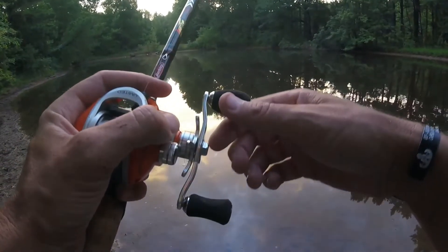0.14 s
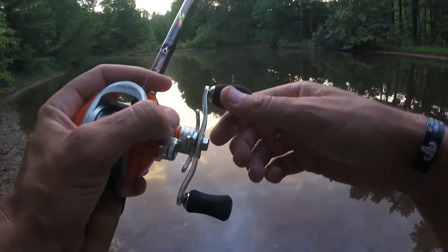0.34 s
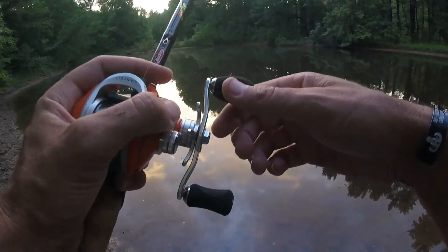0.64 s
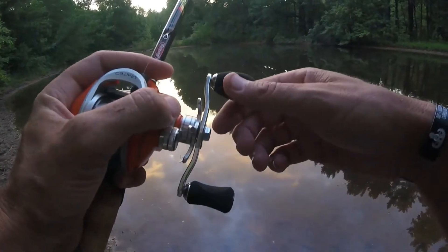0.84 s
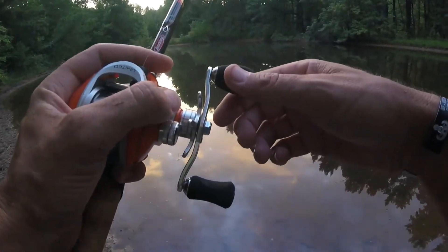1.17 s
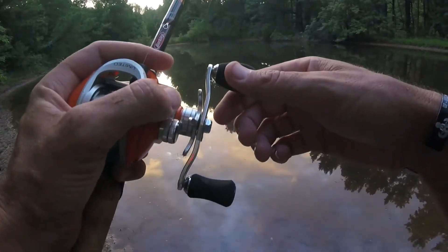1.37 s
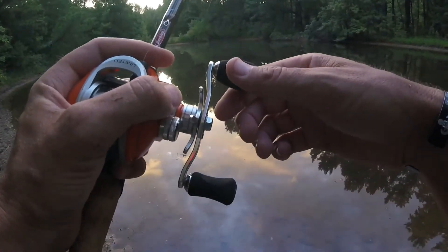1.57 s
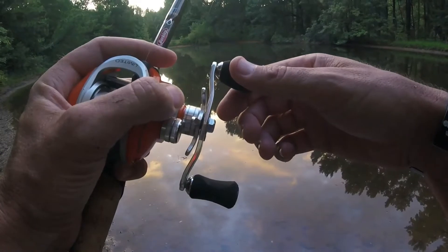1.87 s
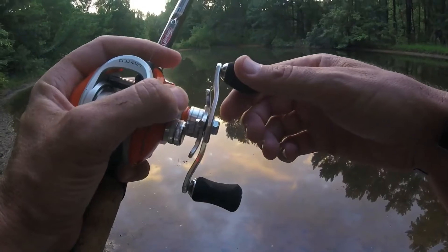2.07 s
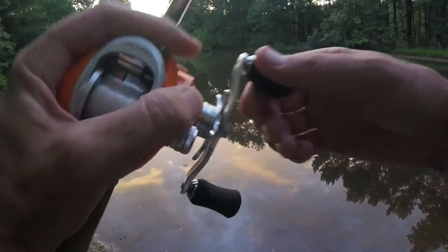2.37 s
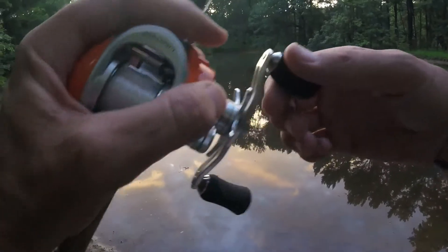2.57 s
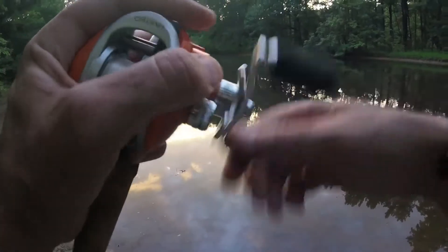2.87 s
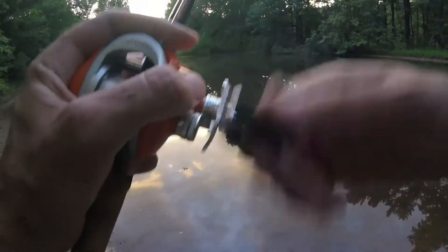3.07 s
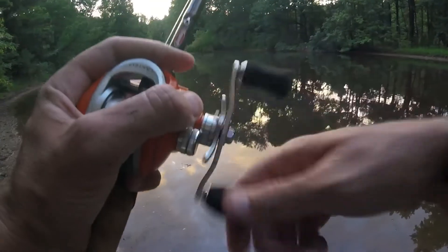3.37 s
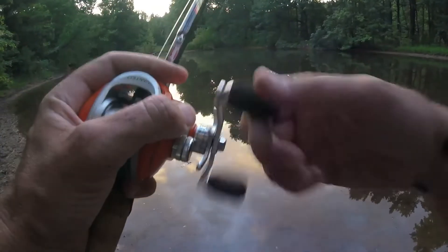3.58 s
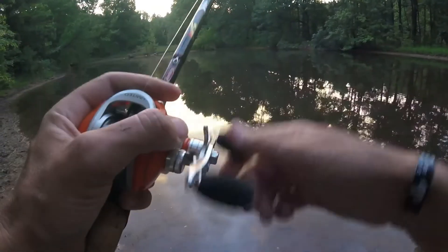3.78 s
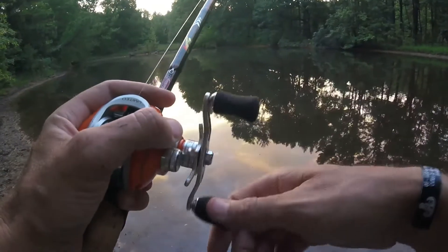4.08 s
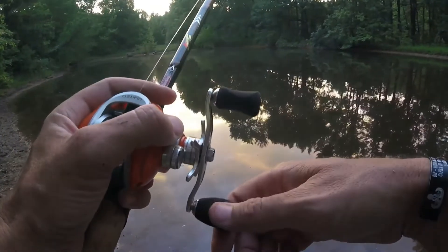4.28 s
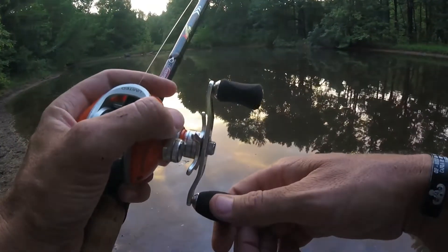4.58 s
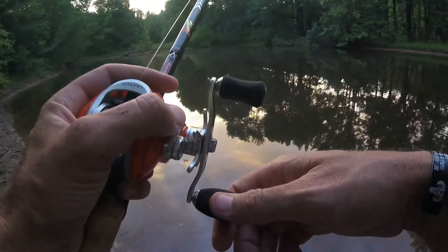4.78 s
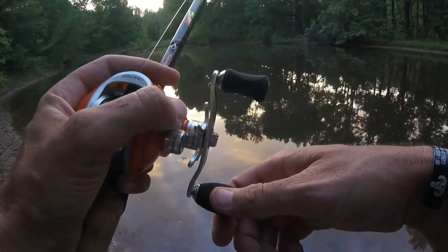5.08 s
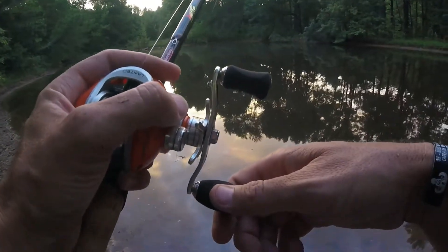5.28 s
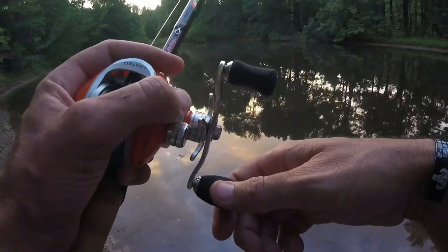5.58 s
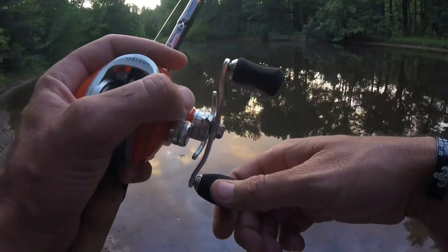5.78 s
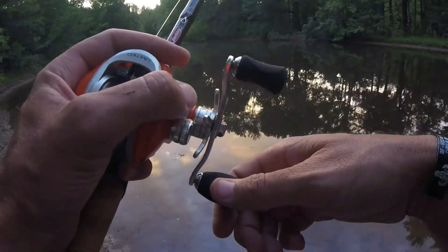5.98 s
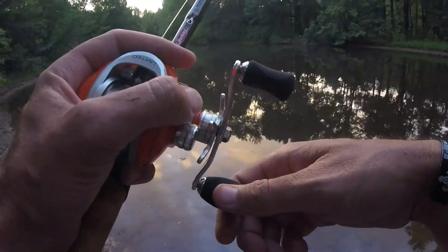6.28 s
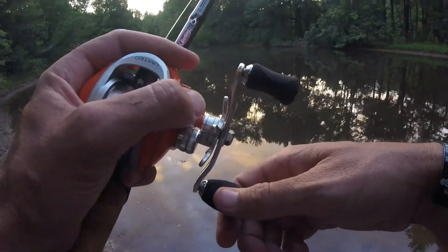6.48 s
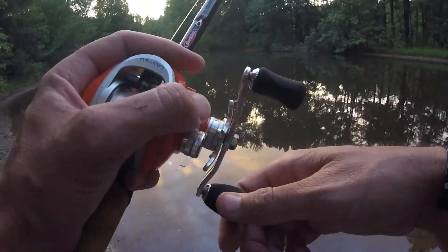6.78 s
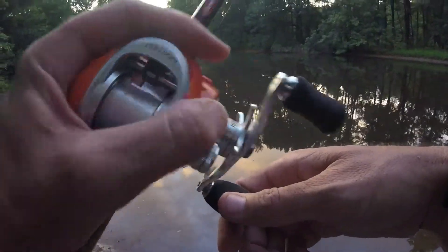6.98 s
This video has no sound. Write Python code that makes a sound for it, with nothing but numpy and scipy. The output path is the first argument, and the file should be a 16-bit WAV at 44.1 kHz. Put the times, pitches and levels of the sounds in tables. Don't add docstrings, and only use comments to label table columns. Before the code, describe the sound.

Evening crickets trill and chirp by a wooded pond over low traffic rumble; a fishing reel winds briefly with one dull knock, then a jay screams twice.

```python
import sys
import numpy as np
from scipy import signal
from scipy.io import wavfile
from scipy.ndimage import uniform_filter1d

SR = 44100
rng = np.random.default_rng(int(sys.argv[2]) if len(sys.argv) > 2 else 0)


def gain_from_db(level_db):
    decades = np.asarray(level_db, float) / 20
    return 10 ** decades


def materialize(psi):
    bounded = np.clip(np.atleast_2d(psi).T, -1, 1)
    quanta = np.round(bounded * 32767).astype(np.int16)
    wavfile.write(sys.argv[1], SR, quanta)


N = 314874


def evened(x):
    return x / np.sqrt(np.mean(x ** 2) + 1e-20)


def columns(rows, t):
    s, *rest = np.transpose(rows)
    return [np.interp(t, s, c) for c in rest]


def read(points, hz):
    f, value = np.transpose(points)
    return np.interp(np.log(hz + 1), np.log(f + 1), value)


def drift(per_s):
    steps = rng.standard_normal(4096)
    return evened(np.interp(np.arange(N) / SR * per_s, np.arange(4096), steps))


def resonate(x, hz, width_hz):
    turn = np.exp(2j * np.pi * np.cumsum(hz * np.ones(len(x))) / SR)
    r = np.exp(-np.pi * width_hz / SR)
    smooth = signal.lfilter([(1 - r) ** 2], [1, -2 * r, r * r], x / turn + 1e-18)
    return 2 * (turn * smooth).real


def add(mix, s, sound):
    part = mix[round(s * SR):][:len(sound)]
    part += sound[:len(part)]


def air():
    # (frequency [Hz], density [dB per Hz])
    spectrum = [(20, -63), (60, -62.5), (100, -63), (160, -70), (300, -77), (500, -77.5), (800, -75.5),
                (1500, -83), (2500, -88.5), (5500, -93), (7300, -87), (9000, -92), (10500, -99),
                (12500, -95)]
    frames, hz = N // 512 + 5, np.fft.rfftfreq(2048, 1 / SR)
    a, b, patches = rng.standard_normal((frames, 1025, 3)).T
    patches = evened(uniform_filter1d(uniform_filter1d(patches, 24, 0), 10, 1))
    z = (a + 1j * b) * gain_from_db(read(spectrum, hz)[:, None] + 0.83 * patches)
    hiss = signal.istft(z, nperseg=2048, noverlap=1536)[1][:N]
    return gain_from_db(-51.5) * evened(hiss)


def passing(rows, floor_db):
    t = np.arange(N) / SR
    power = gain_from_db(floor_db) ** 2
    for s, db, half_s in rows:
        power = power + gain_from_db(db) ** 2 / (1 + ((t - s) / half_s) ** 2) ** 2
    return np.sqrt(power)


def traffic():
    # (time [s], throb frequency [Hz], throb level [dB])
    engines = [(0, 30.4, -48.5), (.35, 36.7, -58), (.75, 37.7, -42), (1.2, 35.45, -56.5),
               (1.6, 44.1, -47.5), (1.95, 44.7, -54), (2.5, 38.3, -48), (2.9, 35.52, -48),
               (3.45, 36.07, -47), (3.95, 44.9, -49), (4.3, 36.13, -47), (4.9, 37.17, -48.5),
               (5.4, 35.9, -49), (5.75, 43.5, -49), (6.3, 38.2, -46.5), (6.65, 40.77, -53.5),
               (7.14, 37.2, -45)]
    # (nearest [s], rumble level [dB], time to fade by half [s])
    cars = [
        (.2, -54, 0.14),
        (2.1, -46.5, 0.81),
        (3.0, -51, .2),
        (3.5, -57, 0.11),
        (4.65, -46, .3),
        (5.6, -50, 0.27),
        (6.4, -51.5, 0.16),
        (6.92, -60, 0.095),
    ]
    # (nearest [s], tyre drone level [dB], time to fade by half [s])
    lorries = [
        (.9, -62.5, .25),
        (4.25, -54.5, .2),
        (4.7, -56, 0.33),
        (5.9, -60, .15),
    ]
    # (time [s], engine frequency [Hz], level [dB])
    gears = [(0, 126.1, -57), (.9, 128, -66), (1.3, 147.8, -55.5), (1.95, 155, -61), (2.05, 120.5, -72),
             (2.7, 125, -59), (3.6, 140, -61.5), (4.6, 143.5, -65.5), (6.4, 130.4, -68), (6.8, 127.5, -59),
             (7.14, 129, -61)]
    t = np.arange(N) / SR
    hz, throb_db = columns(engines, t)
    throb = np.sqrt(2) * np.sin(2 * np.pi * np.cumsum(hz * (1 + 0.1588 * drift(22))) / SR)
    throb *= evened(gain_from_db(5 * np.minimum(drift(13), .6)))
    rumble = evened(resonate(rng.standard_normal(N), 60.5, 49.0) * gain_from_db(1.1 * drift(12)))
    sub = evened(resonate(rng.standard_normal(N), 26.0, 22))
    engine_hz, engine_db = columns(gears, t)
    engine = evened(resonate(rng.standard_normal(N), engine_hz, 3.5))
    drone = evened(resonate(rng.standard_normal(N), 230.0, 183))
    low = gain_from_db(throb_db - 1.7 + 0.5 * drift(49)) * throb
    low = low + passing(cars, -55) * rumble + gain_from_db(-54.5) * sub
    return low + gain_from_db(engine_db - 2.5) * engine + gain_from_db(-5.5) * passing(lorries, -65) * drone


def reel():
    # (time [s], peak [dB], ring frequency [Hz], ring width [Hz])
    ticks = [
        (2.353, -44, 2010, 560),
        (2.765, -41, 4890, 1996),
        (2.908, -58, 4500, 500),
        (3.521, -52, 4500, 600.2),
        (6.963, -56, 1703, 500),
        (7.003, -48, 2065, 704),
    ]
    # (time [s], peak [dB], frequency [Hz], t60 [s])
    knocks = [
        (3.6574, -39, 244, .047),
        (3.752, -42, 275, .07),
        (3.7593, -43, 338, .06),
        (3.7615, -23, 85, .095),
    ]
    # (time [s], level [dB])
    winding = [
        (2.85, -71),
        (3.05, -68.5),
        (3.3, -63),
        (3.55, -67),
        (3.8, -71),
        (4.1, -80),
        (4.3, -85),
    ]
    out, t = np.zeros(N), np.arange(SR // 4) / SR
    for s, db, hz, width_hz in ticks:
        decay = np.pi * width_hz * t
        add(out, s, gain_from_db(db) * np.sin(2 * np.pi * hz * t) * decay * np.exp(1 - decay))
    for s, db, hz, t60 in knocks:
        add(out, s, gain_from_db(db - 60 * t / t60) * np.sin(2 * np.pi * hz * t) * np.minimum(t * hz, 1))
    hiss = evened(resonate(rng.standard_normal(N), 1780, 2200))
    return out + gain_from_db(columns(winding, np.arange(N) / SR)[0] + 0.91 * drift(25)) * hiss


def peeps():
    # (start [s], length [s], frequency [Hz], level [dB])
    whistles = [
        (2.04, .07, 3250, -76),
        (3.03, .03, 2600, -70),
        (3.24, .08, 3250, -74),
        (3.33, .08, 3200, -76),
        (5.9, .08, 2770, -77),
        (6.13, .08, 3060, -77),
        (6.3, .1, 3050, -80),
        (6.45, .08, 3050, -78),
    ]
    out = np.zeros(N)
    for s, length, hz, db in whistles:
        t = np.arange(0, length, 1 / SR)
        warble = 1.5 * np.sin(2 * np.pi * 23 * t)
        add(out, s, gain_from_db(db + 4) * np.sin(2 * np.pi * hz * t + warble) * np.sin(np.pi * t / length))
    return out


def phrasing():
    # (end [s], rasp level [dB], hum level [dB], time the hum lingers [s])
    phrases = [
        (4.51, -72, -68.5, .22),
        (5.8, -68, -67, .07),
        (7.05, -66, -62.5, .12),
    ]
    sag_s, hum_rise_s = .07, .03
    t, hz, hum_hz, rasp, hum = np.arange(N) / SR, 4820, 3430, 0, 0
    for end, rasp_db, hum_db, linger in phrases:
        since = t - end
        hz = hz - 220 * np.exp(-(since - sag_s) ** 2 / sag_s ** 2)
        swell_db = np.where(since < 0, 7, -110) * since
        rasp = rasp + gain_from_db(rasp_db + swell_db) * np.clip((since + .95) / .15, 0, 1)
        humming = np.clip(np.minimum(since, linger + hum_rise_s - since) / hum_rise_s + .5, 0, 1)
        hum = hum + gain_from_db(hum_db - 18 * since) * humming
        hum_hz = hum_hz - 1000 * since * humming
    return hz, hum_hz, rasp, hum


def cicada():
    rasp_hz, hum_hz, rasp_level, hum_level = phrasing()
    turns = np.floor(np.arange(N) * 327.3 / SR)
    clicks = evened(np.diff(turns, prepend=0) * (1 + 0.18 * (-1) ** turns))
    ragged = 0.5 * clicks + rng.standard_normal(N) * gain_from_db(1.1 * drift(45))
    rasp = evened(resonate(ragged, rasp_hz, 650))
    hum = evened(resonate(clicks + .45 * ragged, hum_hz, 640))
    return rasp_level * rasp + hum_level * hum


def gesture(start, length, db, shake, late):
    chip_s, croak_s = .022, .028
    top_hz, sag_hz = 826, 55
    t = np.arange(-chip_s, length + croak_s, 1 / SR)
    u, part = np.clip(t / length, 0, 1), [t < 0, t > length]
    after = t - length
    fall = u ** late
    hz = np.select(part, [748, 728 - 1300 * after], top_hz - sag_hz * fall ** 2 * (3 - 2 * fall))
    scream_db = np.interp(u, [0, .7, 1], [-7.5, 0, -9])
    effort_db = np.select(part, [-3.5 - 15 * (t > -.005), -8 - 90 * after], scream_db)
    flutter = 0.015 + shake * np.exp(-((u - .45) / .22) ** 2)
    rasp = np.select(part, [.1, .5], 0.14 + .16 * np.exp(-((u - .48) / .22) ** 2))
    shut_db, open_db, gape_db, opens_s = -13, -5.5, 2, 0.031
    opening_db = open_db + (shut_db - open_db) * np.exp(-t / opens_s) + gape_db * u ** 2.4
    beak_db = np.select(part, [-20, -1.5], opening_db)
    curves = np.array([hz, db + effort_db, flutter, rasp, beak_db])
    return start + t, *uniform_filter1d(curves, size=150, axis=1)


def scream(row):
    # (frequency [Hz], level [dB])
    beak = [(1700, -24), (2300, -7), (2480, -7), (2850, 6.5), (3150, -1), (3600, -11), (4100, -12),
            (4700, -12.5), (4970, -0.5), (5300, -10), (5600, 1.5), (6180, 3), (6300, -18), (8000, -40)]
    t, hz, effort_db, flutter, rasp, open_db = gesture(*row)
    turns, shake = np.cumsum(hz) / SR, 2 * np.pi * 140 * t
    rough = evened(uniform_filter1d(rng.standard_normal(len(t)), 180))
    unsteady = 0.13 * flutter * np.sin(shake) + 0.59 * rasp * rough
    shut_db = 5 * np.minimum(open_db + 15, 0)
    stack = 0
    for k in range(2, 10):
        db = read(beak, k * hz) + open_db * (k > 6) + shut_db * (k > 3)
        stack = stack + gain_from_db(db) * np.sin(2 * np.pi * k * turns + (k - 2) ** 1.13 * unsteady)
    stack *= 1 + flutter * np.cos(shake + 2.4)
    return t[0], gain_from_db(effort_db - 1.0) * evened(stack) * signal.windows.tukey(len(t), .08)


def jay():
    # (start [s], length [s], effort [dB], flutter [0-1], lateness of the pitch fall [exponent])
    screams = [
        (4.745, .187, -48, .6, 1.8),
        (5.172, .196, -47, .4, 1.1),
    ]
    out = np.zeros(N)
    for row in screams:
        add(out, *scream(row))
    return out


def cricket(hz, per_s, sag_hz, waver_hz, duty=.65):
    phase = (rng.random() + np.cumsum(per_s * (1 + 0.0795 * drift(8))) / SR) % 1
    stroke = np.minimum(phase / duty, 1)
    tone = np.sin(2 * np.pi * np.cumsum(hz + sag_hz * (.5 - stroke) + waver_hz * drift(25)) / SR)
    return evened(tone * np.sin(np.pi * stroke) * gain_from_db(0.95 * drift(40)))


def chorus(count=20):
    low_hz, high_hz = 6333, 7064
    place, pace = rng.random((count, 2)).T
    pitches = low_hz + (high_hz - low_hz) * (np.arange(count) + place) / count
    far = 0
    for hz, p in zip(pitches, pace):
        level = gain_from_db(2.8 * drift(3.1) + 0.044 * min(hz - 6450, 0))
        far = far + level * cricket(hz, 30 + 25 * p, 110, 70)
    return gain_from_db(-61.5) * evened(far)


def bursts(rows, floor_db):
    t = np.arange(N) / SR
    chirps = sum(gain_from_db(db) * np.exp(-((t - s) / length * 2) ** 4) for s, length, db, *_ in rows)
    return gain_from_db(floor_db) + chirps


def near_crickets():
    # (middle [s], length [s], level [dB], wing frequency [Hz])
    low_chirps = [(.15, 0.29, -56, 6620), (.6, 0.13, -51.5, 6710), (.95, 0.17, -53, 6660),
                  (1.18, .1, -53.5, 6550), (1.35, 0.17, -52, 6610), (1.49, 0.073, -58, 6580),
                  (1.77, .06, -54, 6550), (1.92, 0.11, -51, 6630), (2.28, 0.12, -54, 6660),
                  (2.63, 0.25, -56, 6690), (3.25, 0.19, -55, 6640), (3.6, .14, -54.5, 6596),
                  (4.06, 0.15, -50.5, 6570), (4.47, 0.11, -49.5, 6570), (4.82, 0.16, -49.5, 6610),
                  (5.15, 0.13, -52, 6600), (5.47, 0.14, -49.5, 6570), (5.73, .12, -57, 6580),
                  (6.02, .16, -59, 6595), (6.29, .1, -55, 6656), (6.58, 0.17, -54, 6650),
                  (6.91, 0.13, -56, 6670), (7.11, .12, -53, 6640)]
    # (middle [s], length [s], level [dB])
    high_chirps = [(.2, 0.34, -62), (.62, 0.11, -59), (.92, 0.081, -55), (1.35, 0.21, -74),
                   (1.92, 0.086, -53), (2.29, 0.15, -54), (2.64, .14, -55), (2.95, .1, -63),
                   (3.24, 0.17, -58), (3.64, 0.1, -56), (4.08, 0.092, -55), (4.44, .12, -54.5),
                   (4.8, 0.15, -57), (5.18, .16, -56), (5.47, .14, -65), (5.77, .14, -61),
                   (6.04, 0.095, -63), (6.28, .12, -57), (6.7, 0.17, -58), (7.08, .14, -59)]
    low_hz = columns(low_chirps, np.arange(N) / SR)[2]
    pair = cricket(low_hz + 35, 39.5, 90, 34.67) + 0.84 * cricket(low_hz - 90, 42.5, 90, 35.25)
    low = gain_from_db(-5.0) * bursts(low_chirps, -64) * pair
    high = gain_from_db(-2.0) * bursts(high_chirps, -96.5) * cricket(7005, 37, 45, 25.3, duty=1.0)
    return low + high


def woods(x):
    # (delay [s], level [dB])
    echoes = [
        (.035, -6.5),
        (0.076, -12),
        (0.131, -13),
    ]
    # (t60 [s], level [dB])
    tails = [
        (.35, -9),
        (1.2, -10),
    ]
    at = np.arange(400, SR, 20) + rng.integers(0, 20, (SR - 381) // 20)
    fading = 0
    for t60, db in tails:
        fade = gain_from_db(-60 * at / SR / t60)
        fading = fading + gain_from_db(db) * fade / np.linalg.norm(fade)
    tail = np.zeros(SR + 20)
    tail[at] = rng.choice([-1., 1.], len(at)) * fading
    tail = 1.03 * tail + 1.26 * resonate(tail, 3000, 640)
    for s, db in echoes:
        tail[round(s * SR)] += gain_from_db(db)
    return x + signal.fftconvolve(x, tail)[:N]


def scene():
    near, buzz = near_crickets(), cicada()
    wet = woods(jay() + chorus() + peeps() + 0.24 * near + 0.13 * buzz)
    animals = wet + 0.47 * near + 1.05 * buzz
    return (animals + air() + traffic() + reel())[None]


def roll_off(x):
    return signal.sosfilt(signal.butter(12, 13060, fs=SR, output="sos"), x)


def record(dry):
    mix = signal.sosfilt(signal.butter(2, 17, "high", fs=SR, output="sos"), dry)
    return roll_off(mix)


dry = scene()
out = record(dry)
materialize(out)
```